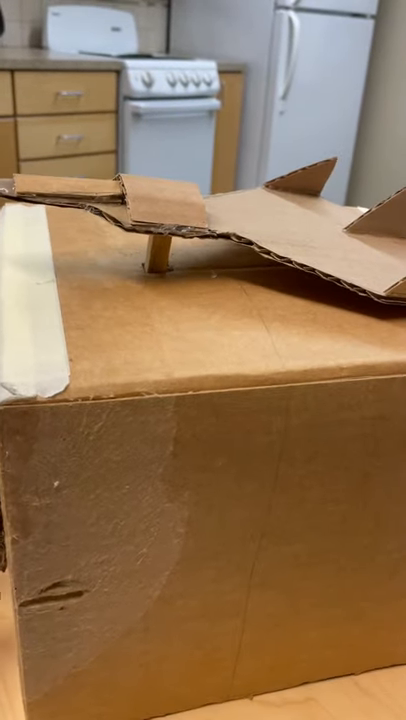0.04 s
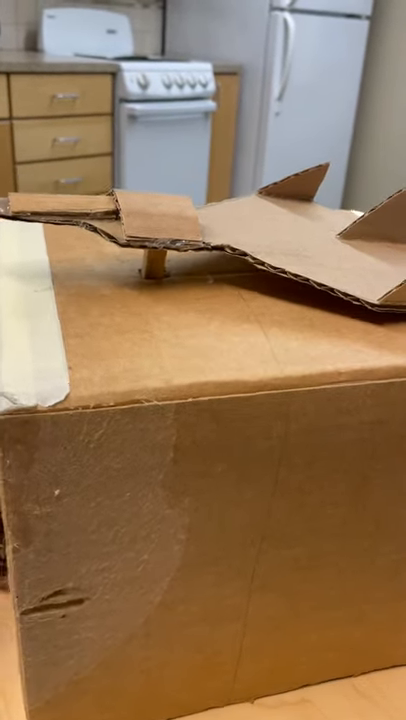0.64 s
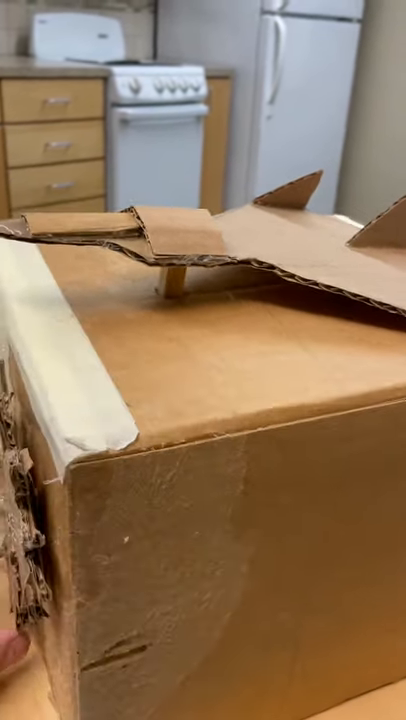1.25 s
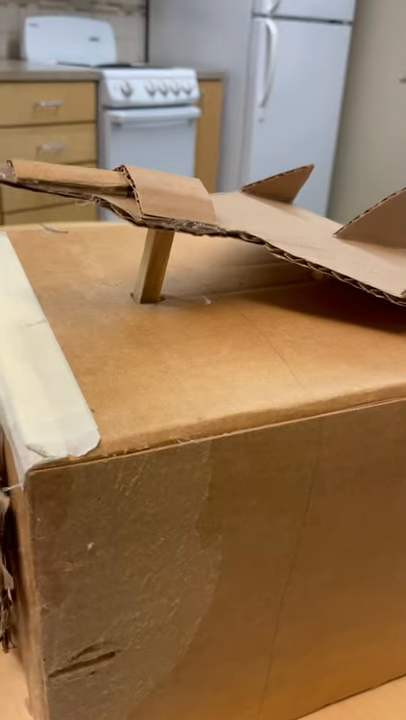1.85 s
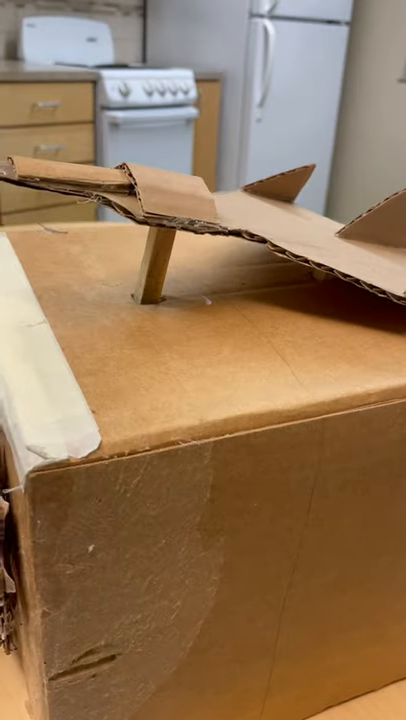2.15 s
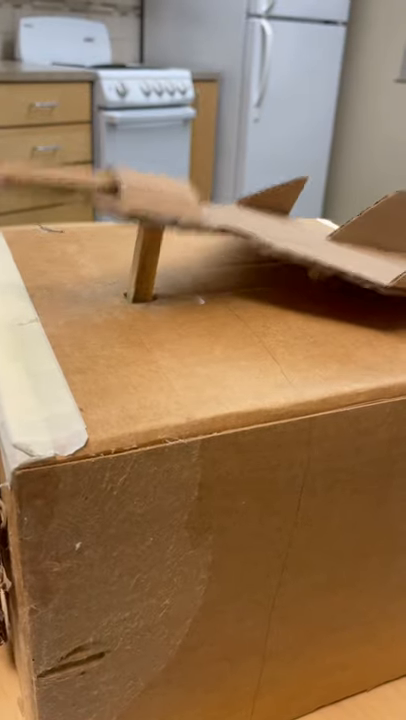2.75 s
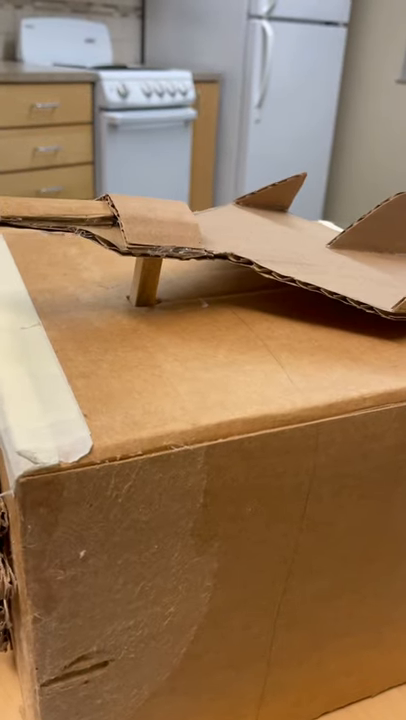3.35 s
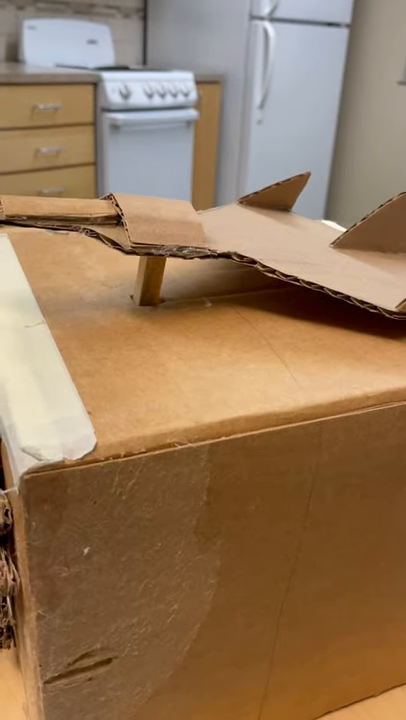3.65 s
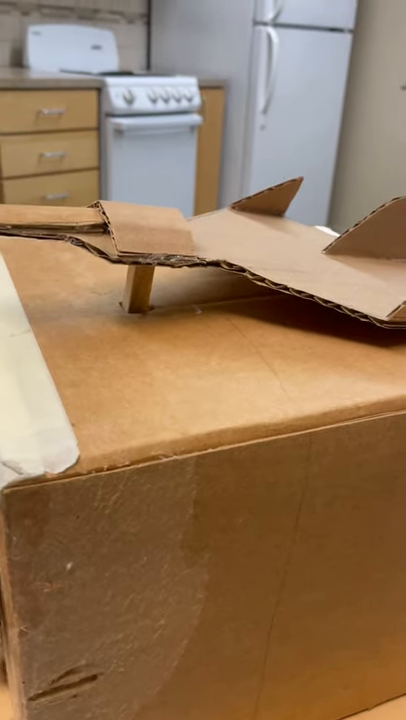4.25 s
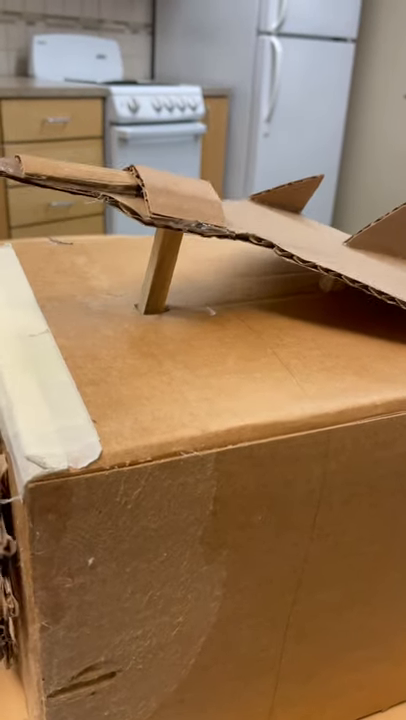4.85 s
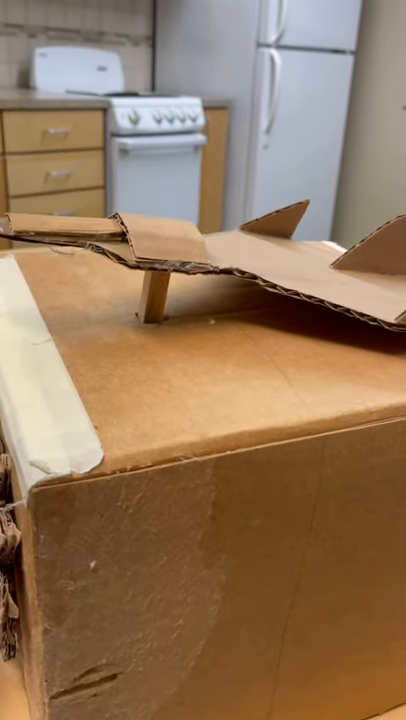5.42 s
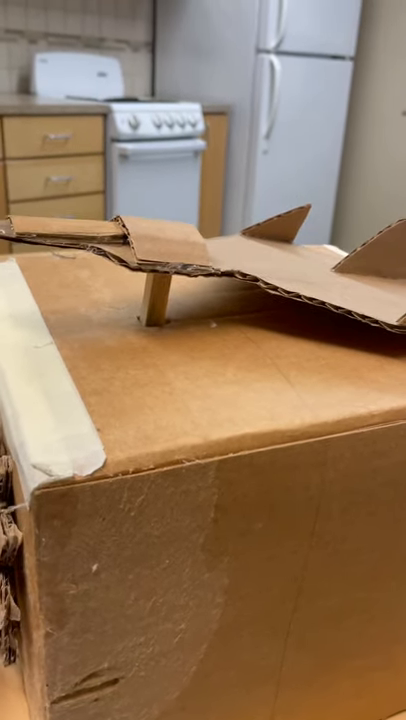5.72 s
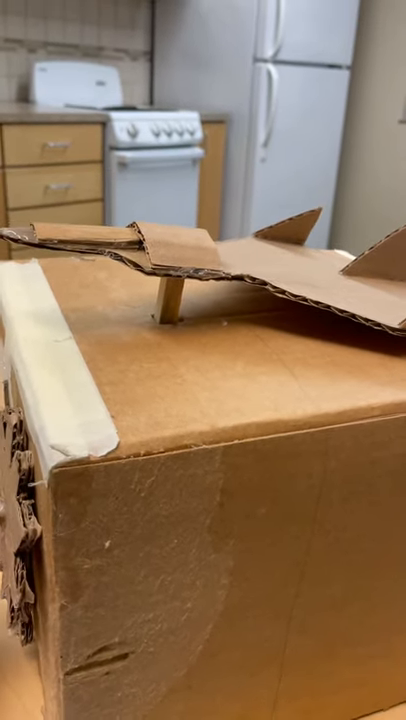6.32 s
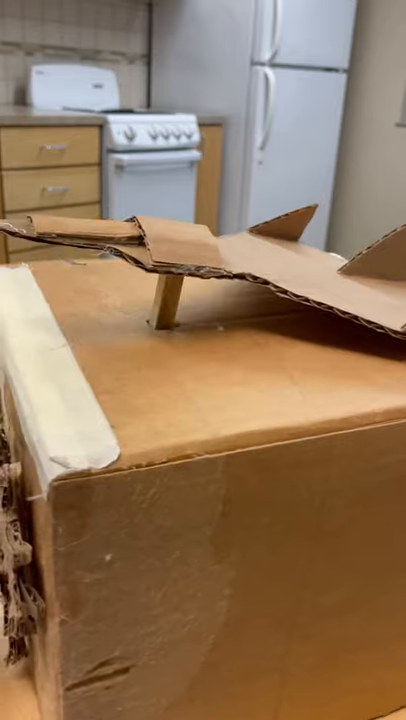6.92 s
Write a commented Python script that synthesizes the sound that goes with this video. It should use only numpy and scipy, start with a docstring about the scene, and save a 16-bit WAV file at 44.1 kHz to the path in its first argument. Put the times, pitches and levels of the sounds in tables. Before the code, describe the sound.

Close to a small stereo microphone, a hand-worked cardboard toy rustles and rasps as its wooden rod rubs in a slot. Soft scrapes and ticks come first, then stronger clusters of hollow knocks and crackly clicks as the rod and a cardboard plane hit the box, with brief lulls between. The cardboard flexes with dull bumps, and a low rumble runs underneath in the slightly echoing kitchen.

```python
"""A wooden rod scrapes up and down through a slot in a hollow cardboard box, lifting a cardboard plane.
A hand works this toy in a quiet kitchen, close to a small stereo microphone. The rubbing makes paper
fibres fizz and the box's panels hum. At the ends of the strokes, rod and plane knock on the box.
Paper edges tick as they snap past each other. Dull low bumps come from flexing cardboard and from one
soft puff of air on the microphone. The kitchen adds a short echo, a low rumble and a faint hiss."""
import sys
import numpy as np
from scipy import signal
from scipy.fft import rfft, irfft
from scipy.io import wavfile
from scipy.ndimage import uniform_filter1d

SR = 44100
rng = np.random.default_rng(int(sys.argv[2]) if len(sys.argv) > 2 else 0)


def persist_wave(psi):
    """Save psi, clipped to +-1, as 16-bit WAV."""
    counts = np.round(np.clip(psi, -1, 1) * 32767).astype(np.int16)
    wavfile.write(sys.argv[1], SR, np.atleast_2d(counts).T)


N = 316638


def gain_of(db):
    """Turns decibels into a number to multiply a sound by."""
    return 10 ** (np.asarray(db) / 20)


def unit_level(x):
    """Scales a signal so that its average size (rms) is 1."""
    return x / np.sqrt(np.mean(x ** 2) + 1e-20)


def look_up(points, hz):
    """Reads between the rows of a (frequency, value) table, with octaves evenly spaced."""
    f, value = np.transpose(points)
    return np.interp(np.log(hz + 1), np.log(f + 1), value)


def frequencies(x):
    """The frequencies in a sound's spectrum."""
    return np.fft.rfftfreq(x.shape[-1], 1 / SR)


def coloured(x, points):
    """Makes each frequency louder or softer, following a table of f/Hz, level/dB."""
    return irfft(rfft(x) * gain_of(look_up(points, frequencies(x))), x.shape[-1])


def resonate(x, hz, sharpness):
    """Lets a sound ring at one pitch; the sharper the resonance, the longer it rings."""
    return signal.lfilter(*signal.iirpeak(hz, sharpness, SR), x)


def add(mix, start_s, sound):
    """Mixes a sound in at the given time."""
    part = mix[..., max(round(start_s * SR), 0):][..., :sound.shape[-1]]
    part += sound[..., :part.shape[-1]]


def wander(per_s):
    """A random curve that heads for a new value per_s times a second."""
    steps = rng.standard_normal(8192)
    t = np.arange(N) / SR
    return unit_level(np.interp(t * per_s, np.arange(len(steps)), steps))


def stereo(pair, side):
    """Makes left and right from a shared part and a differing part; more side sounds wider."""
    return np.array([pair[0] + side * pair[1], pair[0] - side * pair[1]])


def rubbing(resting_db=-97.5, arch_power=0.85, slip_stop_s=0.011, slip_box_db=-7):
    """How hard the rod's rubbing drives three things over time: the fibres, its own edge and the box."""
    # smooth drags: start/s, length/s, level/dB, extra on the edge/dB, extra on the box/dB
    drags = [(-0.08, .22, -70, 3, -14), (0.191, 0.16, -74, 3, 6), (0.328, 0.14, -69, 7.5, 3.5),
             (0.435, 0.19, -65.5, 4, 4), (0.606, 0.3, -66, 5, 2.5), (0.923, 0.13, -72, 3, -5),
             (1.183, 0.077, -78, 4, -6), (1.312, 0.29, -67, 5.5, 5), (1.497, .18, -63, 4, 6.5),
             (1.59, 0.35, -65, 3, 7.5), (1.86, 0.3, -88.5, 6, 14), (2.134, 0.17, -79.5, 6, 9.5),
             (2.523, 0.14, -61, -11, 11), (2.632, .17, -63, 4, 10), (2.759, 0.27, -70, 7, 10),
             (2.98, 0.37, -82.5, 0, 9.5), (3.719, 0.17, -68, 9, 3), (3.743, 0.13, -48.5, 3.5, -3.5),
             (3.807, 0.32, -60.5, 4, 4), (4.025, 0.17, -66, 8, 9), (4.14, 0.17, -80.5, -1, 5),
             (4.601, 0.12, -58, 3, 8.5), (4.676, 0.64, -72.5, 6.5, 10), (4.884, 0.47, -59.5, 5, 5),
             (5.31, 0.27, -80.5, -7, -6), (5.705, 0.55, -75.5, 6, 10.5), (6.11, 0.26, -80, 3, 8.5),
             (6.373, 0.21, -78.5, 1, 6), (6.54, .29, -62.5, 5.5, 7), (6.783, 0.16, -71.5, 4.5, 3.5),
             (6.948, 0.16, -83.5, -18, 11)]
    # the rod sticks, then slips: fastest moment/s, level/dB, build-up/s, extra on the edge/dB
    slips = [(0.013, -61.5, 0.018, 3), (.355, -67, .004, 5), (.538, -53.5, 0.022, 3),
             (0.908, -60, 0.022, 0), (0.976, -51.5, 0.016, -2), (1.612, -59, 0.029, -1),
             (1.715, -58.5, 0.027, 7), (2.58, -52.5, 0.026, 1), (2.618, -49.5, 0.023, 3),
             (2.707, -48.5, 0.027, 4), (2.897, -43.5, 0.016, 1), (3.093, -70, .008, 8),
             (3.815, -46, 0.015, -16), (3.941, -49, 0.055, 0.5), (4.006, -57.5, 0.0043, 12),
             (4.678, -45.5, 0.024, 0), (4.992, -42.5, 0.015, -4.5), (5.122, -42.5, 0.029, -2.5),
             (5.228, -39, 0.0096, -1), (5.243, -46, 0.0058, 0), (6.599, -42, 0.013, 2.5),
             (6.636, -41.5, 0.024, -1)]
    power = np.full((3, N), gain_of(resting_db) ** 2)  # the hand is never quite still
    for start, length, db, edge_db, box_db in drags:
        t = np.arange(max(start, 0), start + length, 1 / SR)
        speed = abs(np.sin(np.pi * (t - start) / length)) ** arch_power  # speeds up, then slows down
        add(power, start, (gain_of([[db], [db + edge_db], [db + box_db]]) * speed) ** 2)
    t = np.arange(-SR // 4, SR // 4) / SR
    for when, db, build_s, edge_db in slips:
        speed = np.exp(np.minimum(t / build_s, -t / slip_stop_s))[t >= -when]
        add(power, when + t[0], (gain_of([[db], [db + edge_db], [db + slip_box_db]]) * speed) ** 2)
    return np.sqrt(power)


def fibres(per_s, spread_db):
    """Paper fibres slip in tiny random clicks of uneven size."""
    sizes = gain_of(spread_db * np.minimum(rng.exponential(1, (2, N)), 5))
    signs = rng.choice([-1, 1], (2, N))
    slipping = rng.random((2, N)) < per_s / SR
    return unit_level(sizes * signs * slipping)


def sliding(x, patch_db):
    """As the point of contact slides, narrow bands of the sound swell and fade."""
    spectra = signal.stft(x, nperseg=512)[2]
    patches = rng.standard_normal(spectra.shape[1:])
    for _ in range(2):
        patches = uniform_filter1d(patches, size=3, axis=0)  # smooth across frequency
        patches = uniform_filter1d(patches, size=7, axis=1)  # smooth across time
    spectra *= gain_of(patch_db * unit_level(patches))
    return unit_level(signal.istft(spectra, nperseg=512)[1][:, :N])


def rod_scrape(fizz_db=5.5, panel_db=4.5):
    """The rod judders through its slot: fibres fizz, its edge rasps and the box's panels hum."""
    # tone of the fine paper fibres: f/Hz, level/dB
    fizz_tone = [(100, -37), (1500, -29), (5000, -5.5), (6800, -0.5), (7900, 8), (9200, 1.5), (10500, -2),
                 (13500, 0.5), (15800, -6.5)]
    # tone of the rod's edge on the slot: f/Hz, level/dB
    rasp_tone = [(100, -30), (800, -15), (1600, 6), (2600, -1), (3200, -0.5), (3800, -1.5), (4300, 0.5),
                 (5000, -0.5), (5800, -11.5), (7000, -7.5), (9500, -33.5), (15000, -47)]
    # panel resonances stirred by rubbing: f/Hz, width/Hz, level/dB
    panels = [(270, 104.4, 28.5), (397, 85, 22.5), (510, 18, 22.5), (872, 106, 17), (1160, 247, 12.5),
              (2170, 83, 2)]
    judder_db = wander(per_s=420) + 1.12 * wander(per_s=45)
    on_fibres, on_edge, on_box = rubbing() * gain_of(judder_db)
    fizz = coloured(fibres(per_s=7000, spread_db=1), fizz_tone)
    fizz = sliding(fizz, patch_db=2.7) * gain_of(fizz_db) * on_fibres
    rasp = coloured(fibres(per_s=2800, spread_db=-3), rasp_tone)
    rasp = sliding(rasp, patch_db=3.5) * on_edge
    push = fibres(per_s=2400, spread_db=1) * on_box
    hum = sum((-1) ** k * gain_of(db) * resonate(push, hz, hz / width)
              for k, (hz, width, db) in enumerate(panels))
    hum = signal.sosfilt(signal.butter(2, 2800, fs=SR, output="sos"), hum)  # big panels: little treble
    return stereo(fizz + rasp, side=0.47) + gain_of(panel_db) * stereo(hum, side=0.58)


def room_tone(rumble_db=-47.5, hiss_db=-80.5, swell_db=-2.3):
    """The room rumbles low, wavering a little, under a faint hiss."""
    # tone of the rumble: f/Hz, level/dB
    rumble_tone = [(12, -47), (20, -17), (43, -2), (181, 0.5), (208, -13.5), (243, 3), (268, -2.5),
                   (367, 0), (405, -5.5), (474, -10), (566, -15), (689, -15.5), (746, -19), (1170, -21),
                   (2200, -50), (2860, -49), (4840, -120)]
    # tone of the hiss: f/Hz, level/dB
    hiss_tone = [(500, -27), (2200, 3.5), (2800, 12.5), (3200, 8), (4000, 5), (5500, -4), (11000, -7),
                 (14000, 4), (16000, 3)]
    rumble = unit_level(coloured(rng.standard_normal((2, N)), rumble_tone))
    rumble *= gain_of(swell_db * wander(per_s=8.4))
    hiss = unit_level(coloured(rng.standard_normal((2, N)), hiss_tone))
    return gain_of(rumble_db) * rumble + gain_of(hiss_db) * hiss


def kitchen_echo(x):
    """Sound bounces around the kitchen many times, and each frequency fades at its own speed."""
    # how long the echo takes to fade by 60 dB: f/Hz, time/s (held to at least 0.2 below)
    fade_times = [(80, 0.15), (200, 0.87), (500, 0.67), (2000, 0.58), (5000, 0.29), (14000, 0.63)]
    # strength of the echo: f/Hz, level/dB
    echo_levels = [(30, -7), (80, 1), (250, -3.5), (600, -7), (1500, -9.5), (5000, -6), (14000, -28)]
    bounces = rng.choice([-1., 1.], (2, SR)) * (rng.random((2, SR)) < .07)
    bounces[:, :SR // 200] = 0  # nothing comes back in the first 5 ms
    hz, t, spectra = signal.stft(bounces, SR, nperseg=256)
    fade = gain_of(-60 * t / np.clip(look_up(fade_times, hz), .2, 1)[:, None])
    fade *= gain_of(look_up(echo_levels, hz))[:, None] / np.sqrt(np.mean(fade ** 2, 1, keepdims=True))
    tail = signal.istft(spectra * fade, SR, nperseg=256)[1] / np.linalg.norm(bounces[0])
    return signal.fftconvolve(x, tail, axes=1)[:, :N]


def paper_ticks(level_db=-8.5, rise_s=0.00018, fade_s=0.0035, edge_db=11.5, tilt_from_hz=630):
    """A paper edge lets go with a short crackle, dull or bright; the edge and the rod ring briefly."""
    # edges snapping past each other: t/s, level/dB, tilt towards treble/dB per octave, edge pitch/Hz
    ticks = [(0.159, -52, -2.5, 1520), (0.2536, -44, -0.5, 1940), (0.5063, -26, -5.9, 1730),
             (0.5364, -31.5, -6, 2080), (0.9334, -41.5, 0, 3790), (0.963, -31, 0.5, 3800),
             (0.9768, -23.5, 0.5, 1890), (0.996, -35, -1, 1930), (1.2057, -45, 4, 4710),
             (1.335, -46, 2, 1490), (1.411, -39, -0.5, 5000), (1.4298, -37, -1.5, 1860),
             (1.8628, -28.5, -1.5, 1850), (1.868, -29.5, -3, 1770), (1.9478, -47, -2.5, 1620),
             (2.9009, -25.5, -4.5, 2050), (3.9363, -28, -2.5, 5860), (4.0033, -30.5, 1, 5830),
             (4.2874, -48, 3, 1560), (4.6795, -30.5, -4.5, 2010), (5.002, -21, 2.5, 2100),
             (5.228, -25, -0.5, 3970), (5.4976, -51, -7, 2390), (5.9271, -42.5, 0.5, 1990),
             (6.1437, -46, -1, 4000), (6.6014, -20, -2.5, 3760), (6.614, -23.5, -5, 2420),
             (6.623, -22, -5, 2100), (6.6654, -26.5, -4.5, 3300), (7.016, -45, 9, 1570)]
    # tone of a paper snap: f/Hz, level/dB
    snap_tone = [(100, 8), (500, -2.5), (1200, -29.5), (2000, 2.5), (4000, 5.5), (7000, 4.5), (12000, 5),
                 (16000, 10)]
    # resonances of the wooden rod: f/Hz, width/Hz, level/dB
    rod_rings = [(1250, 92, 3), (2050, 106, 3.5)]
    t, out = np.arange(4096) / SR, np.zeros((2, N))
    burst = (1 - np.exp(-t / rise_s)) * np.exp(-t / fade_s)
    for when, db, tilt, edge_hz in ticks:
        tone = [(hz, snap_db + tilt * np.log2(max(hz, tilt_from_hz) / 4000)) for hz, snap_db in snap_tone]
        crackle = unit_level(coloured(rng.standard_normal((2, len(t))), tone)) * burst
        edge = gain_of(edge_db) * resonate(crackle, edge_hz, sharpness=16.4)
        rod = sum(gain_of(rod_db) * resonate(crackle, hz, hz / width) for hz, width, rod_db in rod_rings)
        add(out, when, gain_of(db + level_db) * stereo(crackle + edge + rod, side=0.98))
    return out


def box_knocks(boost_db=19.5, boost_octaves=0.16, lag_s=0.00085, contact_s=0.0016):
    """Each blow rings the box; where it lands sets the mix of thud, hollow body, clack and crack."""
    # blows: t/s, level/dB, extra thud/dB, extra clack/dB, body pitch/Hz, clack pitch/Hz, ring time factor
    knocks = [(0.257, -31.5, -8.5, -19, 520, 1190, 0.55), (0.506, -40, -32, -15, 290, 1360, 0.51),
              (0.537, -31.5, -5.5, -11.5, 266, 1290, 0.7), (0.964, -39.5, -0.5, -5.5, 244, 1180, 0.78),
              (0.976, -45, -8, -1, 298, 1180, .9), (1.357, -39, -24, -16, 304, 1140, 0.42),
              (1.863, -31, -12, -11.5, 510, 1120, 0.63), (2.618, -21, -2.5, -17, 390, 1160, 0.23),
              (2.901, -21.5, -23, -4, 236, 856, 0.49), (2.92, -28.5, -2.5, -14, 264, 1280, 0.74),
              (2.938, -30.5, -0.5, -36, 253, 1290, 1), (3.834, -16.5, -13.5, -11.5, 411, 770, 0.83),
              (3.841, -39, -6, -27, 406, 834, 1), (3.883, -27.5, -26, -10.5, 423, 1160, 1.0),
              (3.963, -25, -12.5, -4.5, 416, 1190, 0.91), (3.986, -21.5, -20, -14, 410, 1210, 1.0),
              (4.032, -30.5, -7.5, -6.5, 440, 1170, 1), (4.132, -32.5, -9, -9, 304, 804, 0.99),
              (4.65, -30, -23, -19, 279, 797, 0.66), (4.686, -24.5, -16, -14, 254, 832, 0.83),
              (4.803, -34, -9, -19, 268, 834, 0.26), (4.998, -22, -6, -21, 357, 974, 0.37),
              (5.229, -25, -3, -4.5, 262, 800, 0.31), (5.245, -17.5, -19, -7.5, 404, 1140, 0.46),
              (5.27, -21.5, -13, -41, 363, 1170, 1.0), (6.602, -29, -24, -6, 296, 875, .65),
              (6.625, -16.5, -40, -12, 454, 1130, 0.96), (6.635, -17, -24, -7, 366, 1180, 0.5),
              (6.653, -19.5, -1.5, -10.5, 314, 869, 0.72)]
    # natural tones of the box and rod: f/Hz, level/dB, fade time/s (for 60 dB; shortened below)
    box_tones = [(63.2, -9.5, 0.61), (80.8, 0, 0.17), (127, 4, 0.035), (179.8, 0, 0.47), (236.5, 2.5, 0.21),
                 (264.1, 1, 0.13), (296, -2.5, 0.19), (357.2, 0.5, 0.2), (409.3, 4.5, 0.13),
                 (518, -2, 0.24), (660, -6, 0.068), (860, 5.5, 0.081), (1130, 1, 0.11), (1180, 10, 0.045),
                 (1290, 0.5, 0.17), (1840, -22, 0.019), (1990, 11.5, 0.096), (2194, 13, 0.017),
                 (2400, 3, 0.039), (2700, -1, 0.03), (3340, -14, 0.013), (4330, 2, 0.01)]
    t, out = np.arange(SR // 2) / SR, np.zeros(N)
    hz, tone_db, fade_s = np.transpose(box_tones)[:, :, None]
    fade_s = np.minimum(fade_s, 80 / hz)  # at most 80 swings
    band = np.digitize(hz[:, 0], [220, 650, 1600])  # borders in Hz between thud, body, clack and crack
    age = np.maximum(t - lag_s * np.sqrt(300 / hz), 0)  # low bending waves arrive later
    onset = 1 - np.exp(-(2 * age * hz) ** 2)
    onset *= 1 - np.exp(-t / contact_s)  # soft cardboard cushions the blow
    swing = gain_of(tone_db) * np.sin(2 * np.pi * hz * age) * onset
    for when, db, thud_db, clack_db, body_hz, clack_hz, ring in knocks:
        nearness = sum(np.exp(-(np.log2(hz / f) / boost_octaves) ** 2) for f in (body_hz, clack_hz))
        lift_db = boost_db * nearness * ring ** 2  # a blow that stays in contact stirs all tones alike
        tones = swing * gain_of(lift_db - 60 * age / (fade_s * ring))
        band_levels = [thud_db - 10.5, -12, clack_db - 10, clack_db - 22.5]  # crack grows with clack
        for k, band_db in enumerate(band_levels):
            part = tones[band == k].sum(0)
            add(out, when, gain_of(db + band_db) * part / np.std(part[:SR // 40]))
    return out


def low_bumps():
    """Dull low bumps of a swing or two: flexing cardboard, and one soft puff of air on the microphone."""
    # bumps (the one at 4.062 s is the puff of air): middle/s, level/dB, f/Hz, half length/s
    bumps = [(0.583, -37.5, 107, 0.0093), (2.634, -43, 190, 0.0044), (2.732, -16.5, 270, 0.0029),
             (2.753, -36, 80, 0.014), (2.943, -33, 180, 0.011), (4.062, -35, 63.7, 0.015),
             (4.656, -30.5, 240, 0.0059), (4.687, -27.5, 270, 0.0044), (5.044, -42, 83.3, 0.017),
             (5.102, -16, 252, 0.0035), (5.138, -33.5, 79.6, 0.017), (5.235, -12, 235, 0.0016),
             (5.279, -29.5, 78, 0.013), (6.676, -36.5, 176, 0.0066)]
    t, out = np.arange(-SR // 10, SR // 10) / SR, np.zeros(N)
    for when, db, hz, half_s in bumps:
        swell = np.exp(-(t / half_s) ** 2)
        swing = np.cos(2 * np.pi * hz * t)
        swing -= np.average(swing, weights=swell)  # the wave's ups and downs cancel out
        add(out, when + t[0], -gain_of(db) * swing * swell)
    return out


def scene():
    """The close sounds, their echo and the sound of the room."""
    close = rod_scrape() + box_knocks() + low_bumps() + paper_ticks()
    return close + kitchen_echo(close) + room_tone()


def record(dry, low_cut_hz=34, high_cut_hz=15900):
    """The microphone's two sides hear each frequency a little differently; the extremes are cut off."""
    # stereo width: f/Hz, gain on the difference between the sides/dB
    widths = [(40, -20), (80, -9.5), (160, -15.5), (350, -3.5), (700, 3), (1100, -2.5), (1500, 1.5),
              (2100, -2), (6800, -4.5), (8300, -34), (9300, -17), (11000, 5), (13000, -19)]
    # how far the left side's wave runs ahead: f/Hz, phase/rad
    left_lead = [(300, 0), (550, .7), (800, -.3), (1150, .1), (1450, -.7), (2100, .3), (2850, 1.2),
                 (4200, .4), (5150, 1.0), (5800, -1.6), (6500, -1.0), (7700, -2.9), (9300, -3.2),
                 (12500, -6.28)]
    # how much louder the left side is: f/Hz, level/dB
    balance = [(80, -0.5), (160, 1), (300, -1.5), (600, 2.5), (1100, 1.5), (2000, -1), (3000, 6),
               (6500, 2.5), (8000, 1)]
    low_cut = signal.butter(2, low_cut_hz, "high", fs=SR, output="sos")
    high_cut = signal.firwin(511, high_cut_hz, window=("kaiser", 9), fs=SR)
    left, right = rfft(signal.sosfilt(low_cut, dry))
    hz = frequencies(dry)
    pair = stereo([(left + right) / 2, (left - right) / 2], side=gain_of(look_up(widths, hz)))
    half = np.array([[.5], [-.5]])  # each side takes half, in opposite directions
    pair *= np.exp(1j * half * look_up(left_lead, hz))
    pair *= gain_of(half * look_up(balance, hz))
    return signal.oaconvolve(irfft(pair, N), high_cut[None], "same")


dry = scene()
out = record(dry)
persist_wave(out)
```